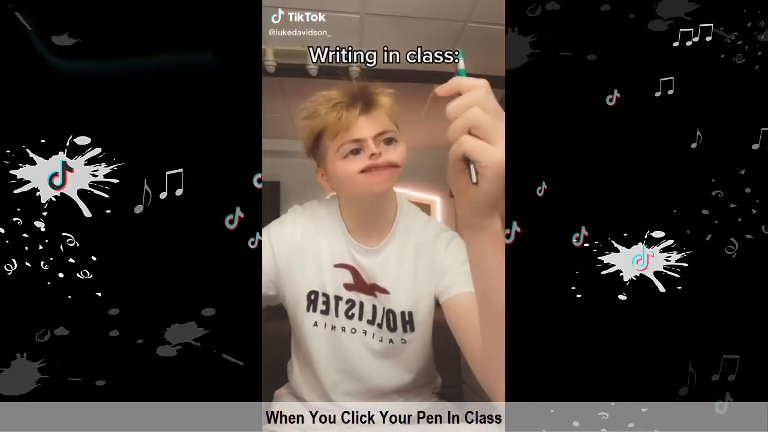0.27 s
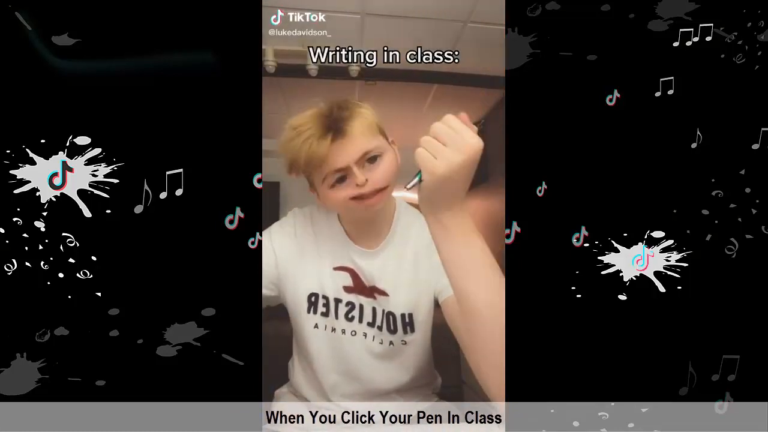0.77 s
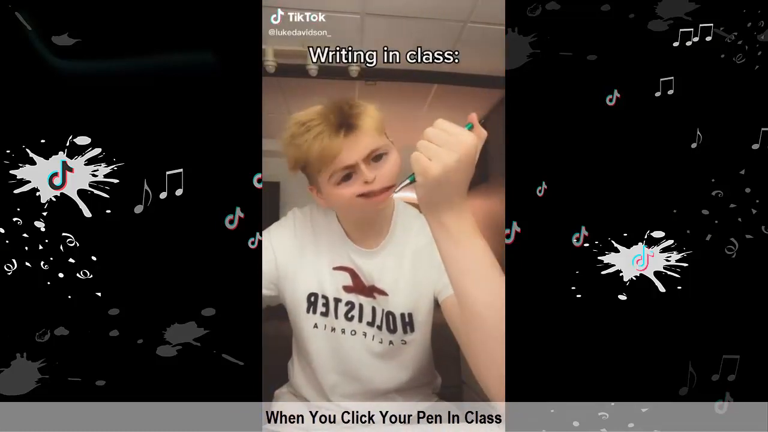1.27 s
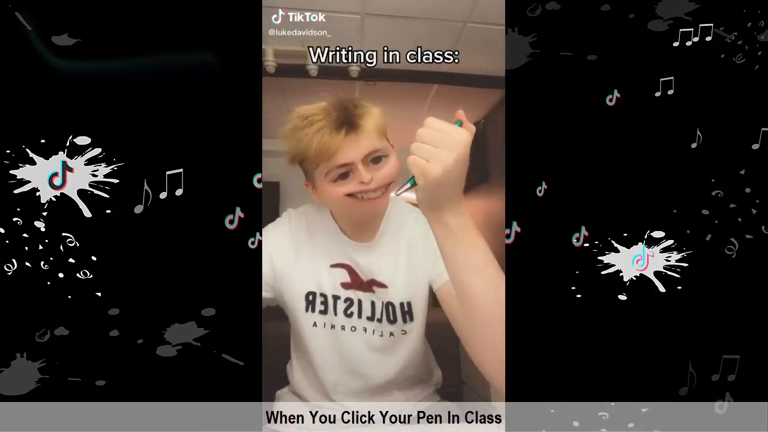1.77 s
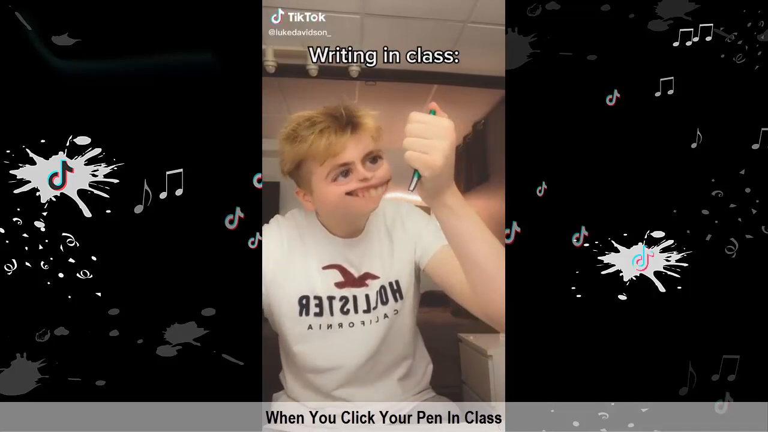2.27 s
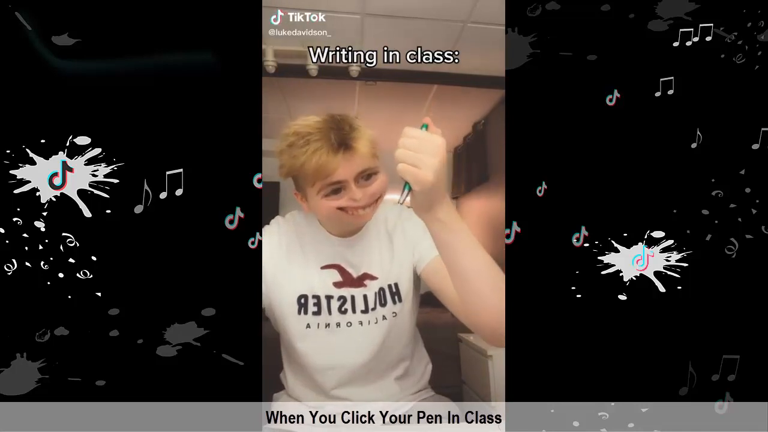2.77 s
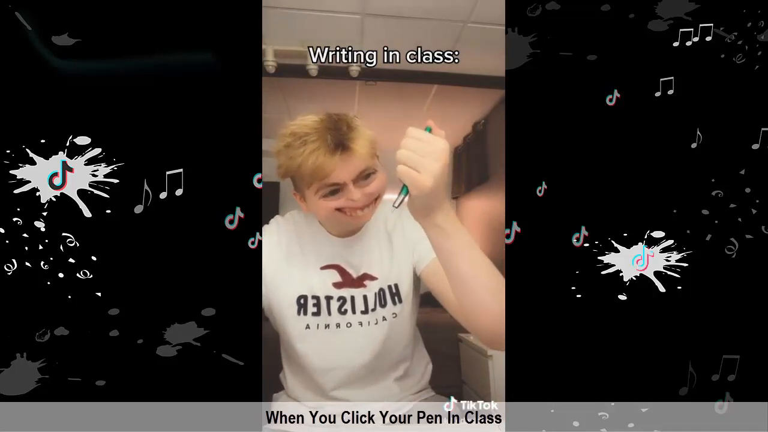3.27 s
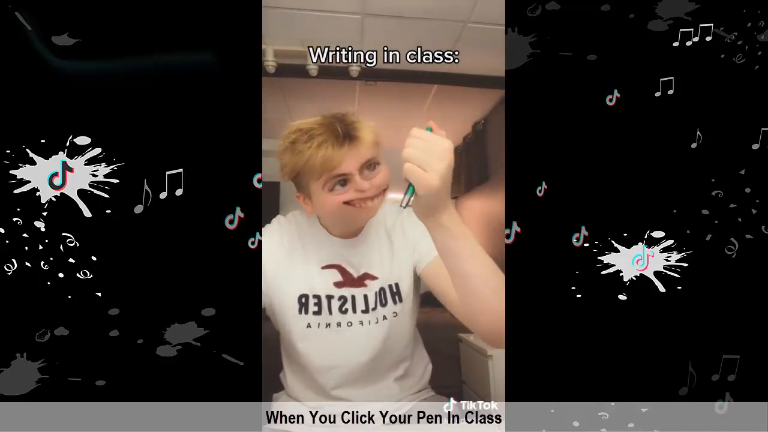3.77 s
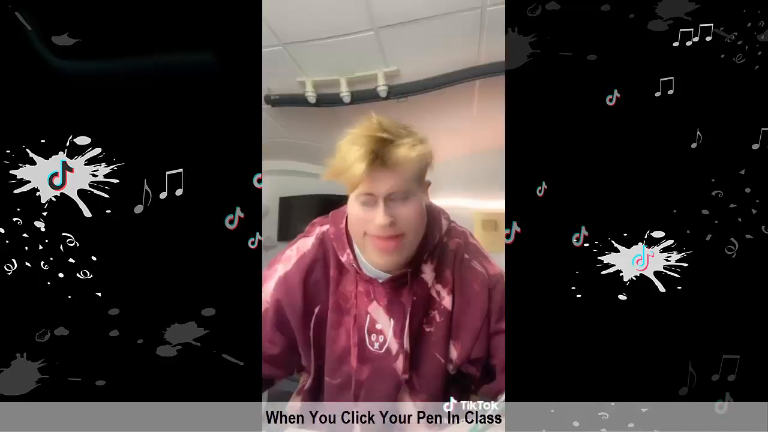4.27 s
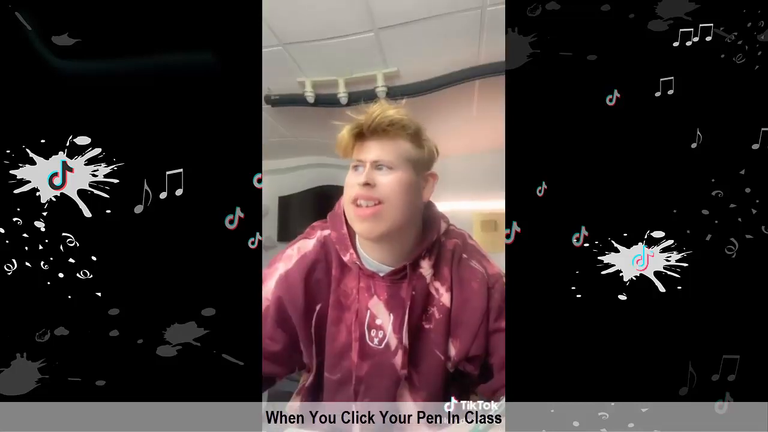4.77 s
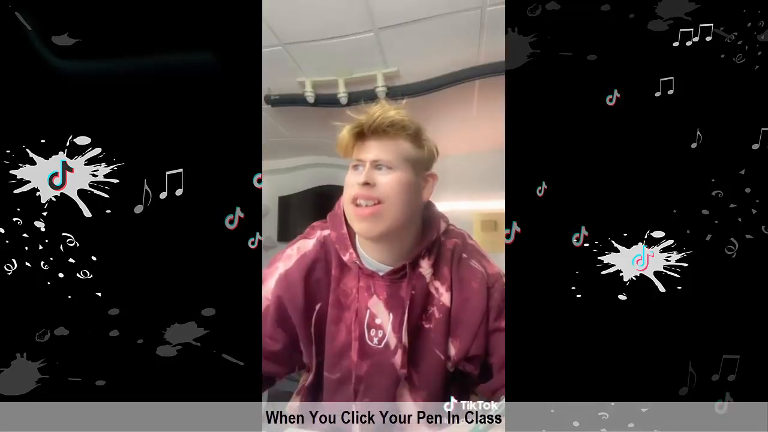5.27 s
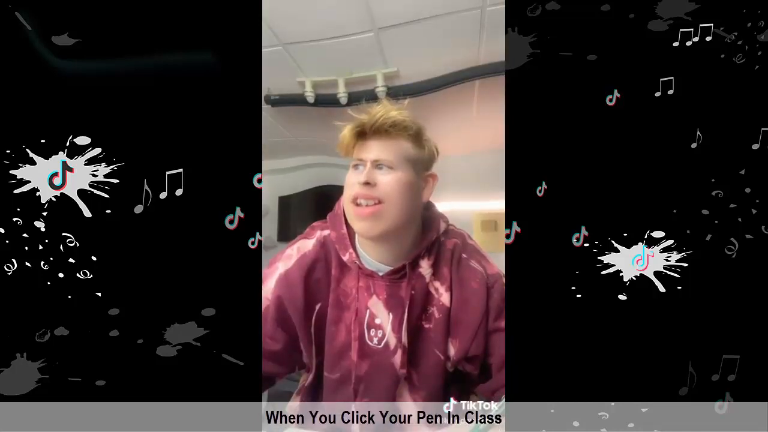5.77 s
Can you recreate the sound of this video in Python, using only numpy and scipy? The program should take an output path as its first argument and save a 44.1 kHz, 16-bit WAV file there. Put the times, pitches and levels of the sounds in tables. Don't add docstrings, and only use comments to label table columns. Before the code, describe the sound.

A phone a little way from the hand picks up fast pen clicking indoors. Nearly a second of low duct hum and handling rumble comes first, then crisp, dry clicks with spring chatter and soft fist knocks. They grow denser and more hollow and plasticky, continuing to the end over light hiss, thin high whistles and a weak far engine.

```python
import sys
import numpy as np
from scipy import signal
from scipy.fft import rfft, irfft
from scipy.io import wavfile
from scipy.ndimage import uniform_filter1d, minimum_filter1d, map_coordinates

SR = 44100
rng = np.random.default_rng(int(sys.argv[2]) if len(sys.argv) > 2 else 0)


def unload_wav(signal):
    wavfile.write(
        sys.argv[1],
        SR,
        np.round(np.clip(np.atleast_2d(signal).T, -1, 1) * 32767).astype(np.int16),
    )


def voltage_ratio(decibels):
    exponent = np.asarray(decibels, float) / 20
    return 10 ** exponent


N = 264600

# (frequency [Hz], density [dB per Hz])
RUMBLE_SPECTRUM = [(12, -17), (25, 20), (45, 10), (70, 12), (110, 12), (200, -18)]
# (frequency [Hz], density [dB per Hz])
VENT_SPECTRUM = [(53, -57), (90, -20), (162, -3.5), (251, -5), (402, -4.5), (437, -3), (572, -6),
                 (622, -14), (676, -6), (1260, -15.5), (1620, -14), (1790, -14), (3510, -24), (5000, -27.5),
                 (6500, -36), (11000, -120)]
# (frequency [Hz], density [dB per Hz])
HISS_SPECTRUM = [(2500, -3.5), (4000, 0), (7000, -7.5), (11000, -5.5), (13000, -18), (16000, -13.5)]
# (frequency [Hz], width [Hz], height [dB])
DUCT_MODES = [(219, 123, -1.5), (255.8, 31, 0), (341.3, 54, -4.5), (391.3, 23, 3), (566, 76, -6)]
# (time [s], level [dB])
HANDLING_LEVEL = [(0, -70.5), (.45, -66.5), (.7, -80), (.9, -70), (1.08, -81), (1.3, -74), (1.7, -78),
                  (1.85, -98), (3, -106), (4.4, -85), (4.7, -97), (5.3, -78), (5.75, -90), (6, -78)]
# (time [s], level [dB])
VENT_LEVEL = [(0, -59.5), (.5, -60), (2.2, -59.5), (4.2, -59.5), (4.7, -57), (4.95, -59.5), (5.3, -55),
              (5.75, -56.5), (6, -56.5)]
# (time [s], hiss level [dB])
GATE_LEVEL = [(0, -68), (.9, -74), (1.2, -66), (1.9, -61), (6, -51.5)]
# (time [s], frequency [Hz], level [dB])
ENGINE_TRACK = [(0, 139, -82), (.2, 152.4, -82), (.35, 149.4, -87), (3.3, 137.2, -93.5), (3.7, 145, -75),
                (4.2, 153.2, -72), (4.5, 150.8, -79), (4.8, 150, -77), (5.099, 160.2, -71.5),
                (5.35, 170.7, -70), (5.6, 186.5, -81), (5.8, 200.2, -72), (6, 212, -61)]
# (multiple [1], level [dB])
ENGINE_ORDERS = [(1, 3), (1.5, -2.5), (2, -30), (3, -7)]
# (time [s], level [dB], frequency 4.4 ms in [Hz])
HAND_JOLTS = [
    (0.836, -42, 148),
    (1.27, -54, 120),
]
# (start [s], end [s], frequency [Hz])
WHISTLE_TONES = [(1.27, 1.55, 13953), (1.6, 1.69, 13953), (1.62, 1.69, 15332), (1.75, 1.83, 15332),
                 (2.61, 2.67, 13953), (2.61, 2.86, 12576), (2.61, 2.74, 15332), (2.8, 3.33, 15332),
                 (2.9, 3.28, 13953), (3.31, 3.42, 12576), (3.38, 3.97, 15332), (4.27, 4.3, 15332),
                 (4.69, 4.85, 15332), (4.97, 5.2, 15332), (5.32, 5.96, 15332)]
# (frequency [Hz], density [dB per Hz])
SPRING_SPECTRUM = [(2000, -40), (5500, -0.5), (6500, -1.5), (7100, 1), (11000, 0), (12500, 0.5),
                   (15500, -2.5)]
# (time [s], brightest frequency [Hz])
PEN_TILT = [(0, 10450), (1.5, 10200), (1.8, 8150), (2.55, 8500), (3.1, 9100), (3.9, 10800), (4.4, 11800),
            (5.1, 8960), (5.65, 10170), (6, 8600)]
# (time [s], spring level [dB])
THUMB_RUBS = [(0.021, -76), (.099, -63.5), (0.151, -62.5), (0.4, -63), (0.557, -57), (0.7, -64.5),
              (1.246, -52), (1.601, -56), (1.666, -62), (1.752, -51), (1.82, -81), (2.052, -64),
              (2.096, -64), (2.184, -58), (2.314, -49), (2.361, -51), (2.527, -49.5), (2.954, -55),
              (3.005, -70), (3.081, -71.5), (3.145, -75), (3.52, -56), (4.115, -55), (4.611, -61.5),
              (4.669, -64), (5.481, -57), (5.719, -53), (5.82, -62.5), (5.905, -60.5)]
# (frequency [Hz], width [Hz])
BARREL_MODES = [(3450, 930), (4570, 766), (5400, 970)]
# (frequency [Hz], density [dB per Hz])
KNOCK_SPECTRUM = [(250, -11.5), (700, -6.5), (1500, -1.5), (2300, -1), (2900, -2.5), (4000, -8.5),
                  (7000, -34)]
# (time [s], knock [dB], low mode [dB], middle mode [dB], high mode [dB])
GRIP_SCUFFS = [
    (.4, -76, -71, -90, -87),
    (.56, -84, -66.5, -83, -87),
    (4.115, -80, -65, -83, -85),
    (4.611, -92, -89, -81, -88),
    (5.479, -64, -73, -84, -80),
    (5.719, -66, -72, -73, -74),
]
# (time [s], spring [dB], barrel [dB], roll [third turns], sheen [dB])
DRY_CLICKS = [(0.794, -40.5, -54, 3.3, -5), (.896, -38, -64.5, 4, -11), (1.275, -40.5, -56, 2.5, -1.5),
              (1.374, -38, -53, 2.6, 2), (1.627, -38, -56, 1.9, -1.2), (1.78, -47, -58, 1.6, 1),
              (1.913, -43, -51.5, 0.47, 2), (2.142, -51, -51, 2.4, -3), (2.279, -37.5, -48, 1.5, 0),
              (2.336, -43, -48.5, 1.6, -7), (2.49, -40, -48, 0.67, 1.5), (2.619, -39.5, -47, 2.44, -3),
              (2.747, -46, -50.5, 0.47, -1.5), (2.831, -39.5, -57.5, 0.52, 2.5),
              (3.742, -39, -46.5, 3.22, 1.5), (5.057, -39, -44.5, 1.6, 0.5), (5.931, -40.5, -54, 1.3, 1.5)]
# (time [s], spring [dB], barrel [dB], roll [third turns], sheen [dB])
HOLLOW_CLICKS = [(1.871, -37.5, -43.5, 2.7, 1), (2.212, -42, -41.5, 1.62, -8), (2.9, -46, -40.5, 2.58, 1.5),
                 (3.416, -38.5, -42.5, 2.7, 4.5), (3.457, -40.5, -43, 1.55, -7),
                 (3.617, -43, -41.5, 1.43, 2), (3.895, -44, -34, 2.3, -5), (4.451, -40.5, -41.5, 3.24, -3),
                 (4.692, -43.5, -38, 2.5, -5.5), (4.867, -42, -39.5, 1.53, 5.5),
                 (4.978, -38.5, -42, 3.06, -2), (5.214, -41.5, -42, 1.57, -2)]
# (time [s], spring [dB], barrel [dB], roll [third turns], sheen [dB])
FREE_CLICKS = [(.838, -45, -52, 3.3, -1.5), (1.726, -38, -48, 3.22, -3), (2.116, -38.5, -39, 2.63, 5),
               (2.417, -37.5, -49.5, 3.35, 0), (2.55, -38.5, -61.5, 4, -3), (2.688, -34.5, -63, 4, -8),
               (3.249, -40.5, -46.5, 1.92, 5.5), (3.312, -42.5, -41.5, 1.28, -5),
               (3.557, -37, -46, 3.05, 5), (3.701, -38.5, -40.5, 3.22, -6), (3.827, -39, -53, 3.6, 9),
               (3.975, -39.5, -48, 3.4, 0), (4.184, -45.5, -36.5, 2.6, -6), (4.279, -36.5, -45.5, 2.77, 0),
               (4.389, -44.5, -45, 0.54, -1.5), (4.789, -37, -46.5, 3.3, -6),
               (5.15, -36.5, -44.5, 3.26, 5.5), (5.323, -38, -41.5, 1.64, 2), (5.56, -42, -46, 3.44, 1),
               (5.648, -37, -67, 2.1, 9.5)]

SPAN_SAMPLES, LEAD_SAMPLES = 12288, 3072
HARD_DB = -43


def unit(x):
    return x / np.sqrt(np.mean(x ** 2, -1, keepdims=True) + 1e-20)


def along(points, hz):
    f, v = np.transpose(points)
    return np.interp(np.log(hz + 1), np.log(f + 1), v)


def over_time(rows, s):
    return np.interp(s, *np.transpose(rows))


def wobble(rate_hz):
    knots = rng.standard_normal(int(N * rate_hz / SR) + 4)
    return map_coordinates(knots, [np.arange(N) * rate_hz / SR])


def coloured(x, gain):
    n = x.shape[-1]
    return unit(irfft(rfft(x) * gain(np.fft.rfftfreq(n, 1 / SR)), n))


def peak(hz, centre_hz, width_hz, db):
    return 1 + voltage_ratio(db) / (1 + (2 * (hz - centre_hz) / width_hz) ** 2)


def lumpy(x, depth_db):
    z = signal.stft(x, nperseg=2048)[2]
    field = uniform_filter1d(rng.standard_normal(z.shape), size=3, axis=0)
    field = uniform_filter1d(field, size=4, axis=1)
    return unit(signal.istft(z * voltage_ratio(depth_db * field / field.std()), nperseg=2048)[1][:N])


def room():
    t = np.arange(N) / SR

    def noise(spectrum):
        return coloured(rng.standard_normal(N), lambda f: voltage_ratio(along(spectrum, f)))

    def duct(f):
        return np.prod([peak(f, hz, width_hz, db) for hz, width_hz, db in DUCT_MODES], axis=0)

    rumble_db = over_time(HANDLING_LEVEL, t) + 2.2 * wobble(5.8) + 1.5 * wobble(6.1)
    rumble = voltage_ratio(rumble_db) * noise(RUMBLE_SPECTRUM)
    vent_db = over_time(VENT_LEVEL, t) + 0.4 * wobble(7.9)
    vent = voltage_ratio(vent_db) * lumpy(coloured(noise(VENT_SPECTRUM), duct), depth_db=3.5)
    hiss_db = over_time(GATE_LEVEL, t) - 16.5 + 1.5 * wobble(9.1)
    return rumble + vent + voltage_ratio(hiss_db) * noise(HISS_SPECTRUM)


def engine():
    s, hz, db = np.transpose(ENGINE_TRACK)
    t = np.arange(N) / SR
    speed_hz = np.interp(t, s, hz) * (1 + 0.0121 * wobble(3.2))
    phase = 2 * np.pi * np.cumsum(speed_hz) / SR
    orders = np.zeros(N)
    for multiple, order_db in ENGINE_ORDERS:
        orders += voltage_ratio(order_db + 4.3 * wobble(17)) * np.sin(multiple * phase + 0.98 * wobble(10))
    return voltage_ratio(np.interp(t, s, db)) * orders


def hand():
    t = np.arange(N) / SR
    out = np.zeros(N)
    for s, db, hz in HAND_JOLTS:
        u = np.maximum(t - s, 0)
        phase = 2 * np.pi * hz * 0.0117 * np.log(1 + u / 0.0073)
        sagging = np.sin(phase + 0.56 * wobble(91.3))
        out += voltage_ratio(db) * sagging * (1 - np.exp(-u / .003)) * np.exp(-u / .017)
    return out


def shape(t, rise_s, fall_s, lead_db, room_db, t60_s):
    blow = np.exp(-np.where(t < 0, np.abs(t / (1.22 * rise_s)) ** 3, (t / fall_s) ** 2))
    decay = voltage_ratio(room_db - 60 * t / t60_s) / (1 + np.exp(-t / 0.0084))
    lead_in = voltage_ratio(lead_db) * np.exp(-(t / 0.035) ** 4) * (t < 0)
    return np.sqrt(blow + decay ** 2 + lead_in ** 2)


def rattle(draws, gain, uneven_db, ragged_db):
    noise, size, colour = draws.transpose(1, 0, 2)
    hard = 1 + 2 * (size > 2.5)
    fast_db = 0.8 * uneven_db * unit(uniform_filter1d(size, size=40))
    slow_db = 0.73 * unit(uniform_filter1d(size, size=500))
    ticks = noise * hard * voltage_ratio(fast_db + slow_db)
    ragged = voltage_ratio(ragged_db * unit(uniform_filter1d(colour, size=50)))[:, :SPAN_SAMPLES // 2 + 1]
    return coloured(ticks, lambda f: gain(f) * ragged)


def place(s, rows):
    at = np.round(s * SR).astype(int) + np.arange(SPAN_SAMPLES)
    line = np.bincount(at.ravel(), rows.ravel(), N + 2 * SPAN_SAMPLES)
    return line[LEAD_SAMPLES:LEAD_SAMPLES + N]


def spring():
    events = [(s, db, row[-1]) for s, db, *row in DRY_CLICKS + HOLLOW_CLICKS + FREE_CLICKS]
    events += [(s, db, 0) for s, db in THUMB_RUBS]
    s, db, sheen_db = np.transpose(events)[:, :, None]
    t = (np.arange(SPAN_SAMPLES) - LEAD_SAMPLES) / SR
    draws = rng.standard_normal((len(s), 3, SPAN_SAMPLES))
    bright_hz = over_time(PEN_TILT, s) * (1 + 0.01 * draws[:, 0, :1])

    def gain(f):
        sheen = voltage_ratio(sheen_db / (1 + (11750 / (f + 1)) ** 40))
        return voltage_ratio(along(SPRING_SPECTRUM, f)) * peak(f, bright_hz, 6700, 8.1) * sheen

    zing = rattle(draws, gain, 1.9, 1.9)
    lead_db = -16 - 0.36 * (db - HARD_DB) - 4.5
    after_db = -9.5 - 0.084 * (db - HARD_DB) + 3.5
    stretch = 1 + 0.011 * np.maximum(HARD_DB - db, 0)
    return place(s, voltage_ratio(db) * zing * shape(t / stretch, 0.0055, 0.0084, lead_db, after_db, 0.22))


def blows():
    sides = len(BARREL_MODES)
    roll_depth_db = 10.5

    def facing(db, roll):
        return [db - roll_depth_db * (1 - np.cos(2 * np.pi * (roll - k) / sides))
                for k in range(1, sides + 1)]

    rows = []
    for clicks, knock_db in ((DRY_CLICKS, -54.5), (HOLLOW_CLICKS, -55)):
        rows += [(s, knock_db, *facing(db, roll)) for s, _, db, roll, _ in clicks]
    for s, spring_db, db, roll, _ in FREE_CLICKS:
        knock_db = -59 - 0.46 * (spring_db - HARD_DB)
        rows.append((s, knock_db, *facing(db, roll)))
    return rows + GRIP_SCUFFS


def barrel():
    s, knock_db, *mode_db = np.transpose(blows())[:, :, None]
    t = (np.arange(SPAN_SAMPLES) - LEAD_SAMPLES) / SR
    draws = rng.standard_normal((len(s), 3, SPAN_SAMPLES))
    knock = rattle(draws, lambda f: voltage_ratio(along(KNOCK_SPECTRUM, f)), 0.93, 2.5)
    hits = voltage_ratio(knock_db + 0.5) * knock * shape(t, 0.008, 0.0082, -13, -8.5, 0.44)
    for db, (hz, width_hz) in zip(mode_db, BARREL_MODES):
        ring = rattle(draws, lambda f: 1 / (1 + np.abs(2 * (f - hz) / width_hz) ** 3), 2.0, 1.5)
        hits += voltage_ratio(db) * ring * shape(t, 0.0063, 0.007, -25, -7, 0.19)
    return place(s, hits)


def scene():
    return (barrel() + spring() + hand() + room() + engine())[None]


def starved(x, mottle_db, mask_db, quiet_db):
    hz, _, z = signal.stft(x, SR, nperseg=1024)
    band = (np.log(1 + hz / 4000) * 30).astype(int)
    hz = hz[:, None]
    power = np.array([np.mean(np.abs(z[band == k]) ** 2, 0) for k in range(band[-1] + 1)])
    level_db = 10 * np.log10(power + 1e-20)
    luck = uniform_filter1d(rng.standard_normal(power.shape), size=2, axis=1) * 2 ** .5

    core = (hz > 1800) & (hz < 6900)
    loudest_db = -minimum_filter1d(minimum_filter1d(-level_db, size=13, axis=0), size=3, axis=1)
    masked = (level_db < loudest_db - mask_db + 3 * luck)[band] & core
    threshold_db = quiet_db + (hz - 13000) / 350
    faint = ((level_db - 1.5 * luck)[band] < threshold_db) & (hz > 12500)

    gain = voltage_ratio(mottle_db * luck[band] * np.where(core, 1, .6) * (hz > 900))
    gain = gain * np.where(masked, .12, 1) * np.where(faint, .03, 1)
    seam = voltage_ratio(-3 * np.exp(-((hz - 12370) / 250) ** 2))
    gain = gain * (hz < 15800) * seam
    return signal.istft(z * gain, SR, nperseg=1024)[1][:N]


def whistles(x):
    t = np.arange(N) / SR
    band = signal.butter(4, [12000, 15500], "bandpass", fs=SR, output="sos")
    top = signal.sosfilt(band, x)
    treble = np.sqrt(np.abs(uniform_filter1d(top ** 2, size=500)))
    tones = sum(np.sin(2 * np.pi * hz * t) * ((t > a) & (t < b)) for a, b, hz in WHISTLE_TONES)
    return voltage_ratio(-12) * treble ** .85 * tones * voltage_ratio(1.4 * wobble(25))


def roll_off(x):
    return signal.sosfilt(signal.butter(12, 15840, fs=SR, output="sos"), x)


def record(dry):
    thinned = starved(dry[0], mottle_db=1.5, mask_db=20.0, quiet_db=-108.5)
    mix = (thinned + whistles(dry[0]))[None]
    return roll_off(mix)


dry = scene()
out = record(dry)
unload_wav(out)
```